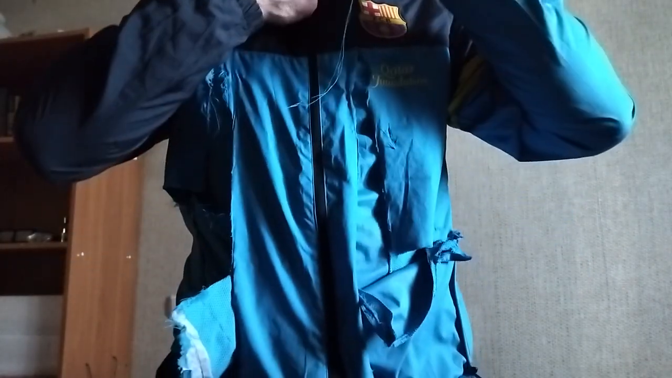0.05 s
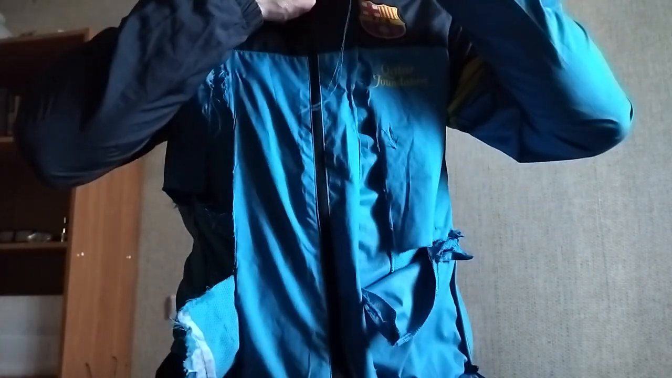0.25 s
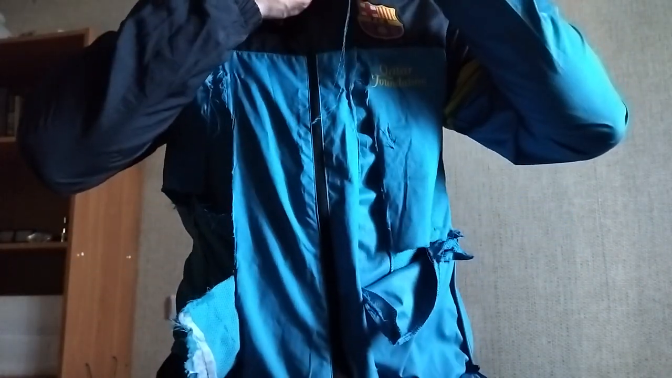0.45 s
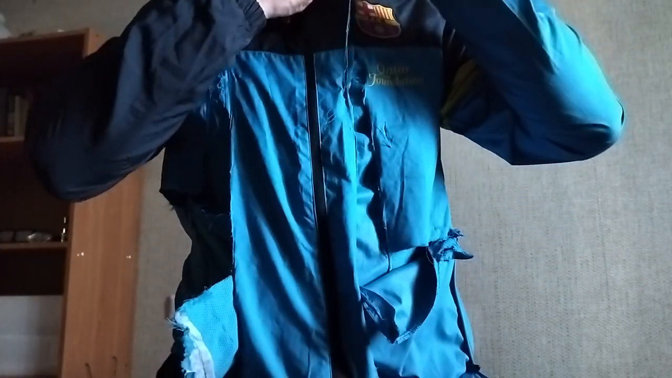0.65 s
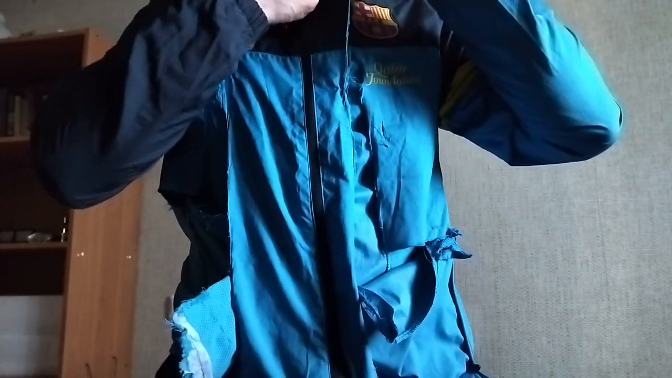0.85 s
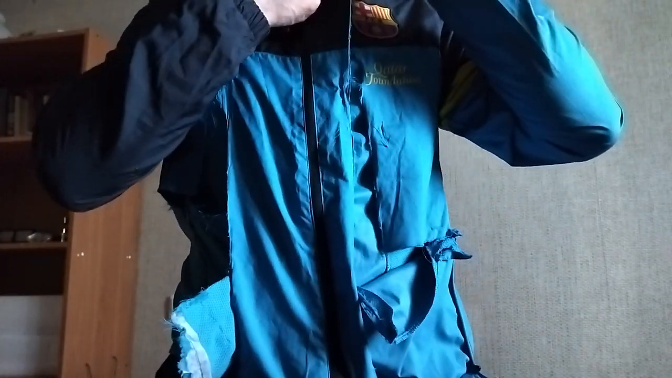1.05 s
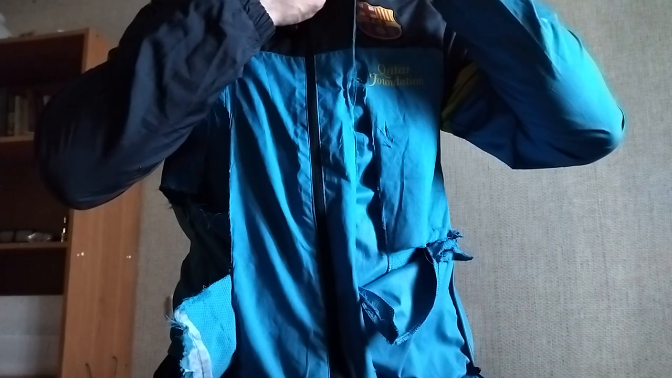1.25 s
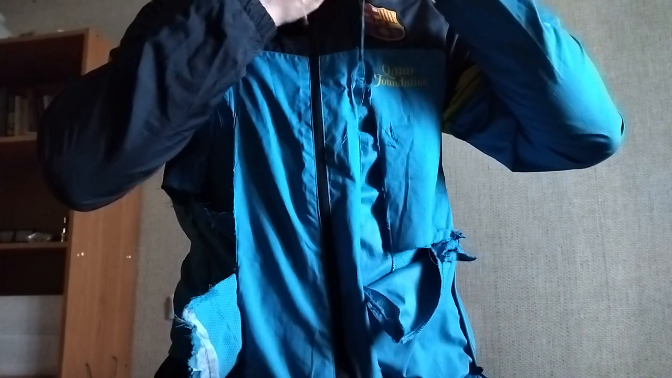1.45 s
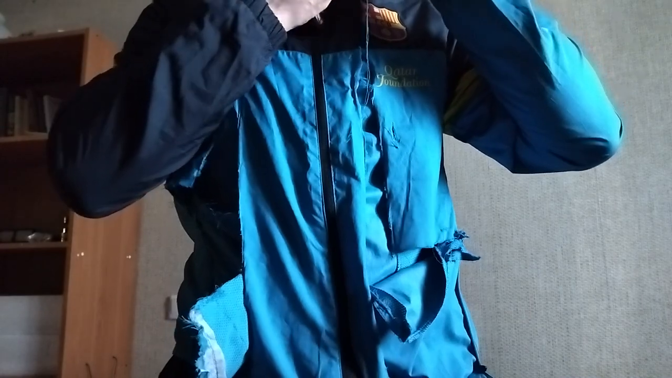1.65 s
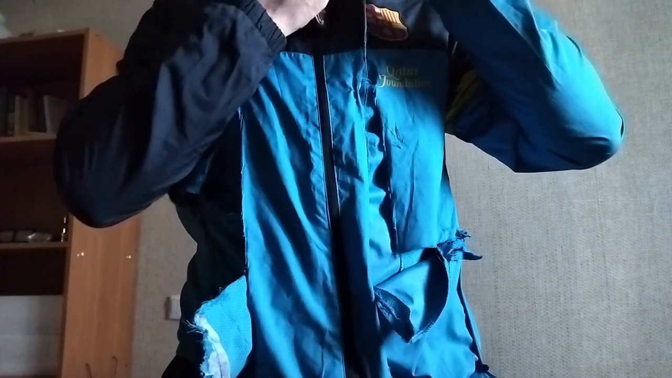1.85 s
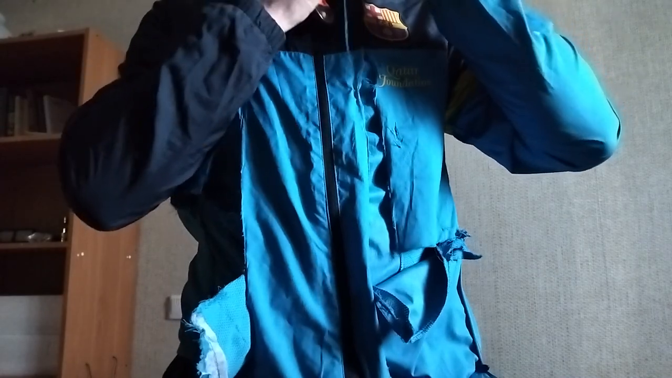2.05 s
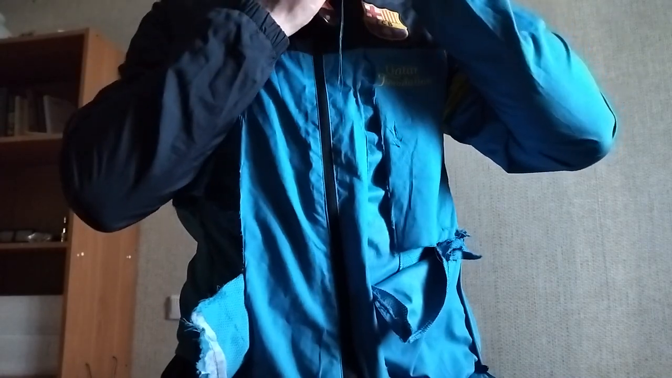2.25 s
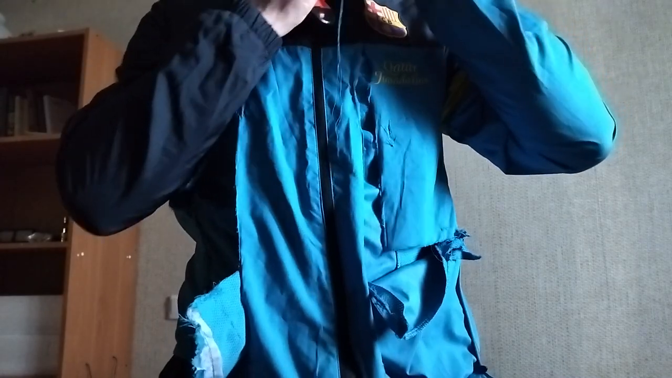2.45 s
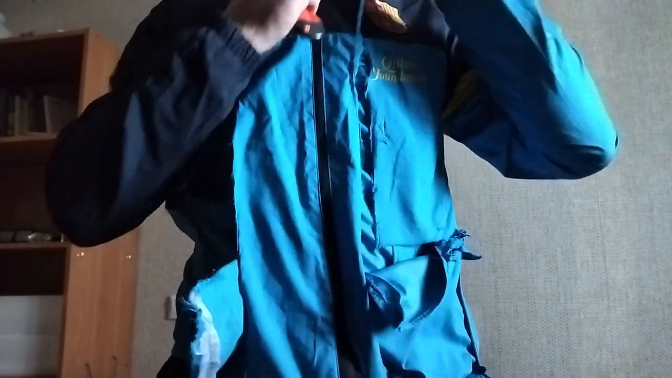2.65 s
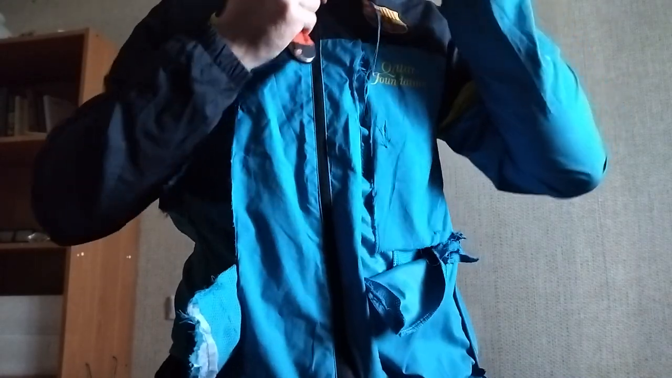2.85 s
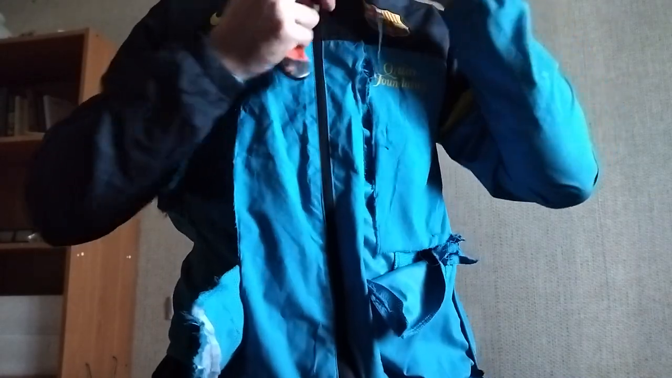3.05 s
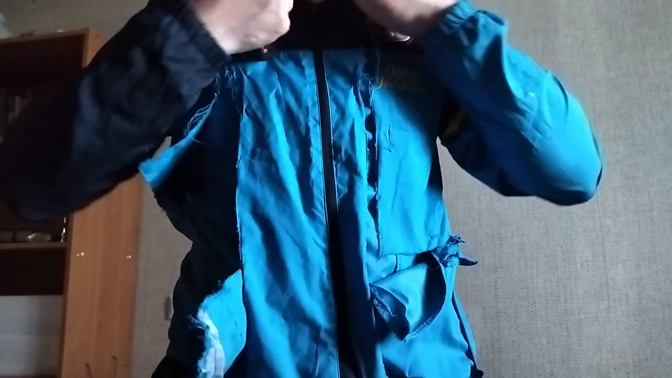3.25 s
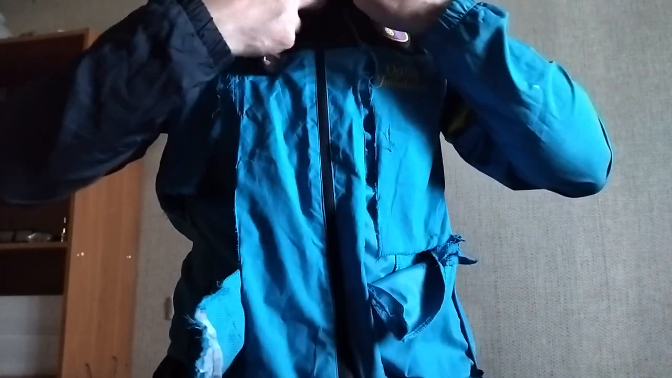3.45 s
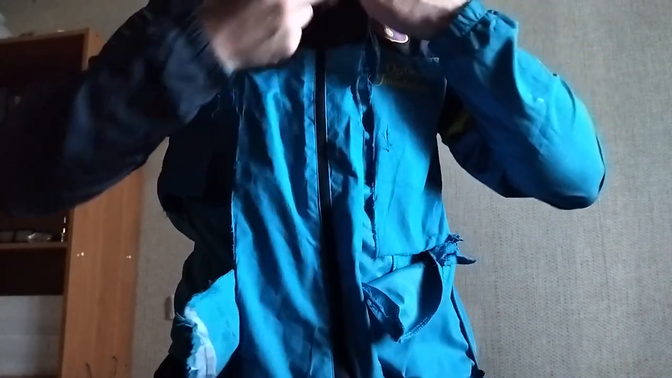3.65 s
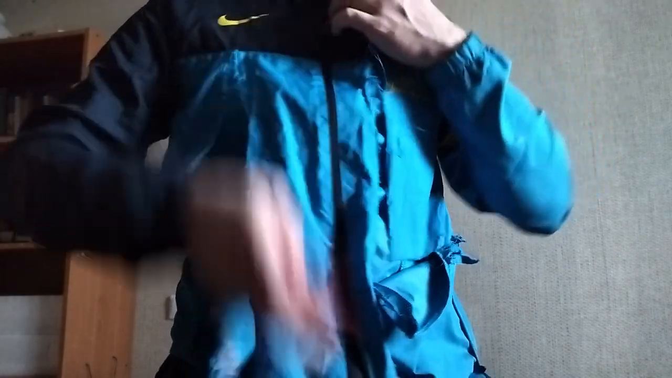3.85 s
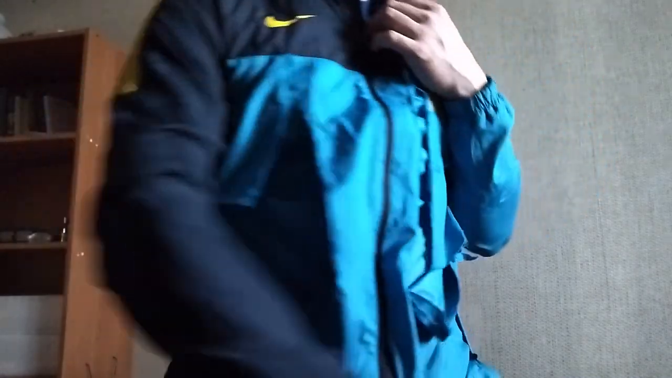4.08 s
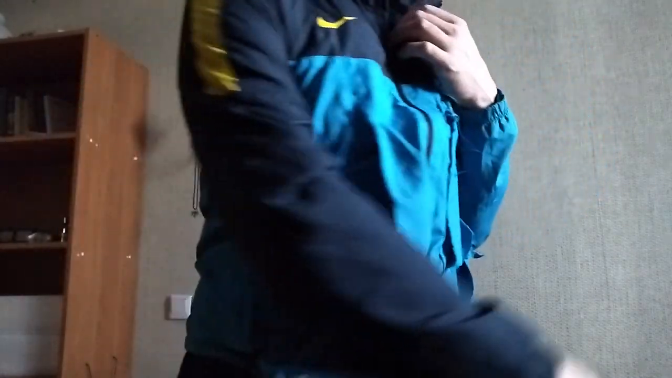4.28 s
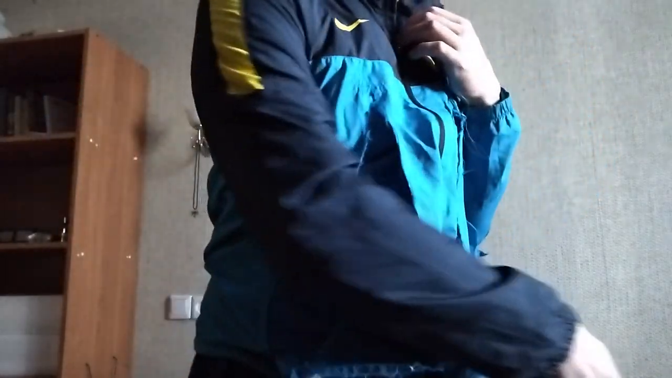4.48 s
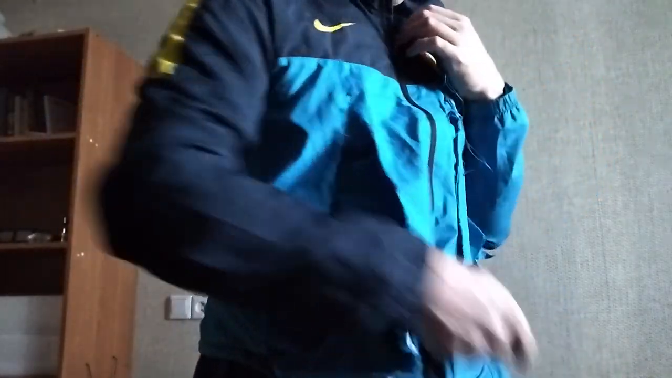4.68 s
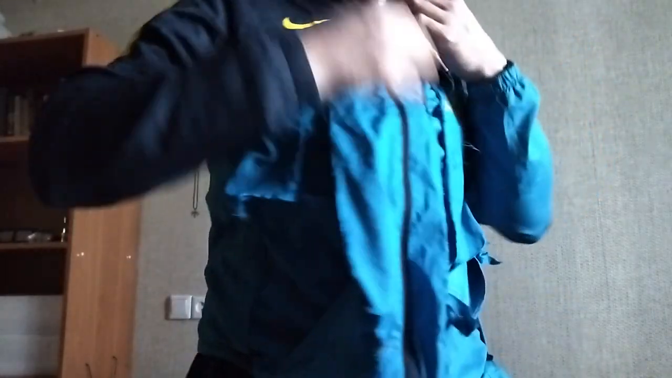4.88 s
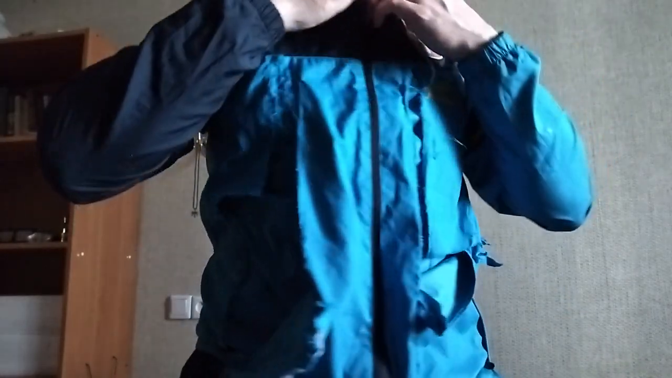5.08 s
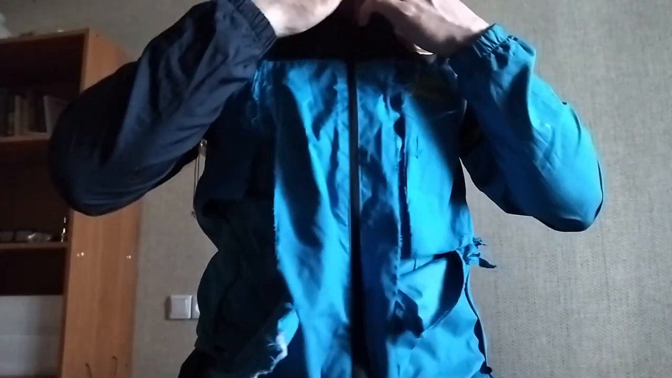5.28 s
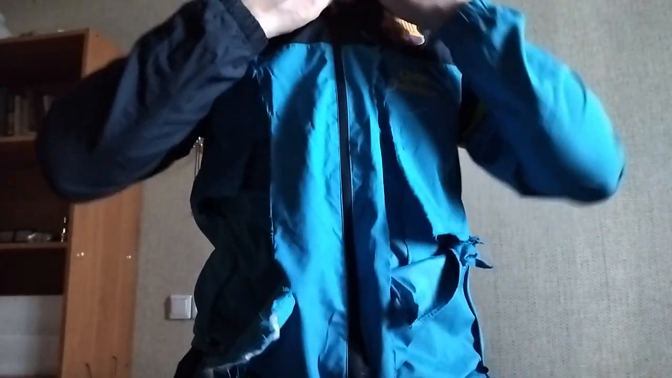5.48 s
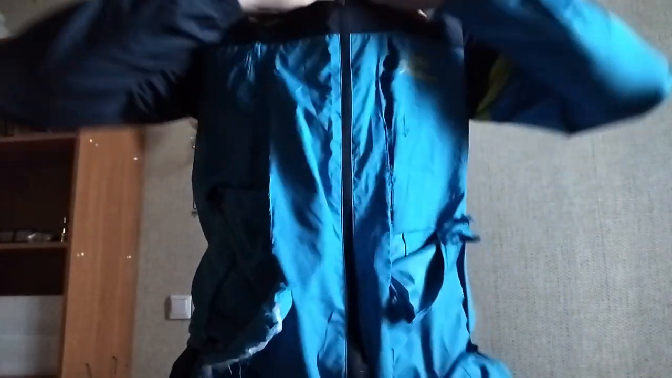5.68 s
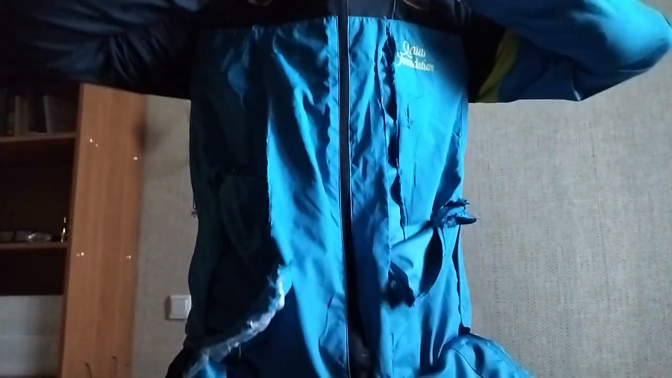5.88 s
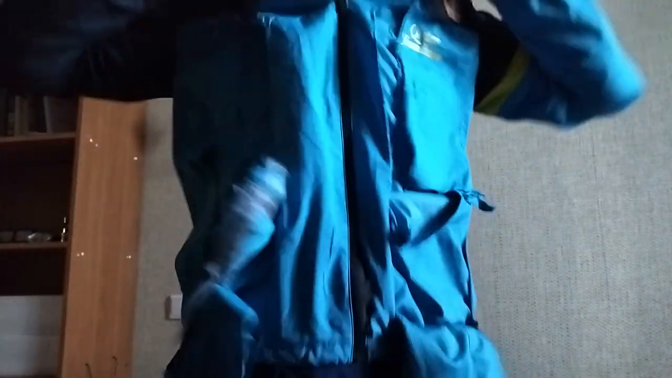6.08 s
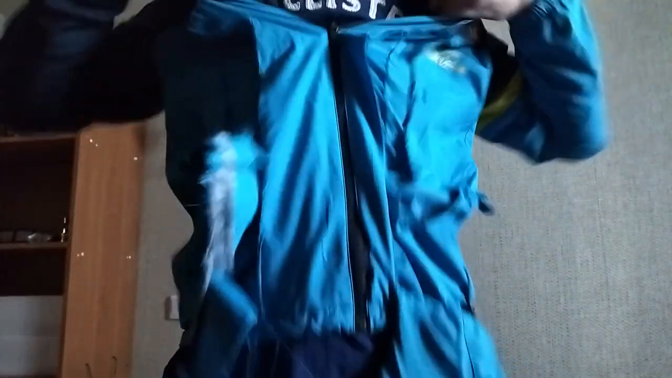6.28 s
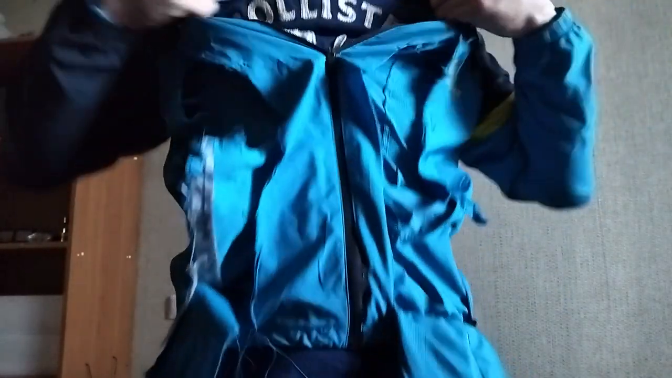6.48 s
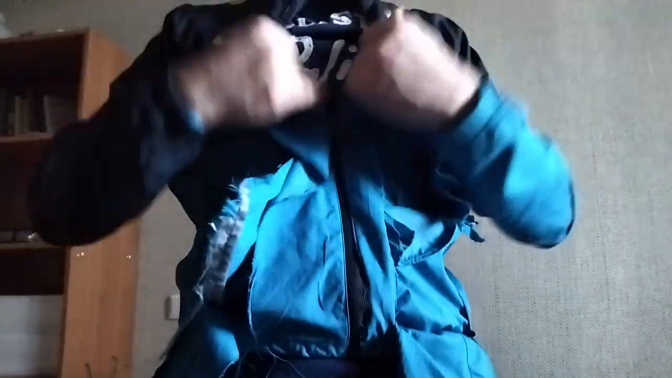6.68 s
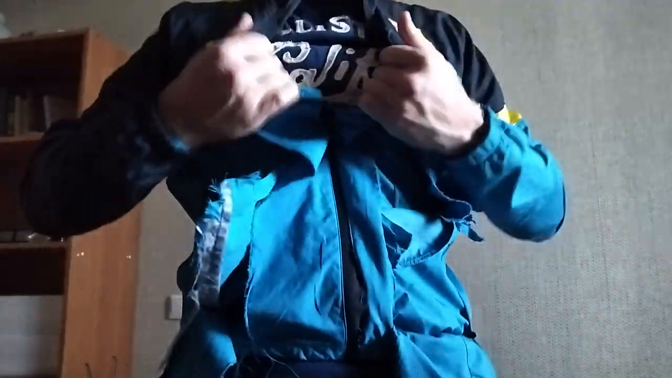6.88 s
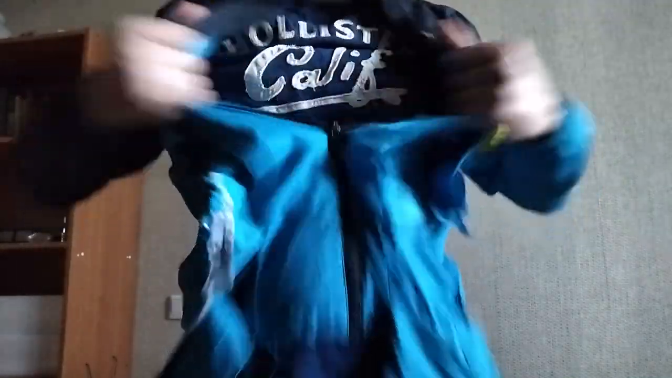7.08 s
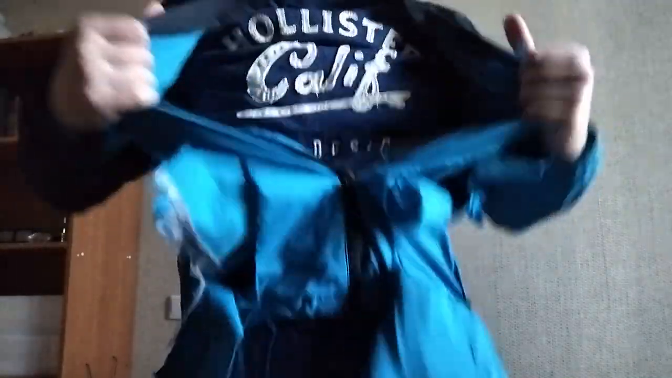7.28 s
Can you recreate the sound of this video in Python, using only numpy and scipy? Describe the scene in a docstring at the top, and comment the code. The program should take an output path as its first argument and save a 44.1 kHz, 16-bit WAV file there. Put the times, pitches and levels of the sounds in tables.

```python
"""A quiet hush and the soft rustle of a thin nylon jacket, worked at the seam by hands in a small quiet room.
It ticks, creaks and scrapes, a small tool lands on a table, then the cloth is ripped three times.
Single threads snap before and during the rips. Cloth is friction noise and random grains, ticks and snaps
are ringing flicks under puffs of noise, the creak is stick and slip, and threads in step are tones.
Two microphone ports a few centimetres apart hear it."""
import sys
import numpy as np
from scipy import signal
from scipy.fft import rfft, irfft, next_fast_len
from scipy.io import wavfile

SR = 44100
rng = np.random.default_rng(int(sys.argv[2]) if len(sys.argv) > 2 else 0)


def persist_wave(psi):
    """Save psi, clipped to +-1, as 16-bit WAV."""
    counts = np.round(np.clip(psi, -1, 1) * 32767).astype(np.int16)
    wavfile.write(sys.argv[1], SR, np.atleast_2d(counts).T)


def magnitude_from_level(level_db):
    """Linear magnitude for a level in decibels (20 dB per decade)."""
    exponent = np.asarray(level_db, float) / 20
    return 10 ** exponent


N = 323253
SIZE = next_fast_len(N + SR // 10, real=True)      # transform length, with room for filter tails
HZ = np.maximum(np.arange(SIZE // 2 + 1) * SR / SIZE, 1)


def rms_one(x):
    """Scale so that the mean of the channels has rms 1."""
    return x / np.sqrt(np.mean(np.atleast_2d(x).mean(axis=0) ** 2) + 1e-20)


def in_time(tables, rest_db=-120):
    """Columns of curve tables at every sample, at rest outside them."""
    s, *columns = np.transpose(np.vstack(tables))
    now = np.arange(N) / SR
    inside = np.any([(now >= t[0][0]) & (now <= t[-1][0]) for t in tables], axis=0)
    return [np.where(inside, np.interp(now, s, c), rest_db) for c in columns]


def at_hz(points):
    """A (frequency, value) table on the transform grid, joined along log frequency."""
    hz, value = np.transpose(points)
    return np.interp(np.log(HZ), np.log(np.maximum(hz, 1)), value)


# phase by which the left port leads the right: (frequency [Hz], lead [radians])
LEAD = [(0, 0), (1200, .1), (3300, 2.8), (10500, 3.2), (12500, 5.5), (16000, 6.3)]
# likeness of the two ports, before the power "apart": (frequency [Hz], likeness [0-1])
LIKENESS = [(60, 0.7), (130, 0.94), (640, 0.89), (1400, 0.68), (3000, 0.49), (7000, 0.11), (9000, 0.12),
            (15000, 0.24)]
# balance of the two ports: (frequency [Hz], left minus right [dB])
TILT = [(60, 0), (200, -1.5), (1300, -2), (2400, -1.5), (4400, 1), (8000, 2), (15000, 1)]
TOP_HZ = 15900


def ports(pair, colour, apart=1):
    """A shared and an unshared signal, coloured and dealt to the two ports; a larger apart makes them less alike."""
    steep_top = np.sqrt(1 + (HZ / TOP_HZ) ** 120)
    shared, own = rfft(pair, SIZE) * magnitude_from_level(at_hz(colour)) / steep_top
    likeness = np.clip(at_hz(LIKENESS), 0, 1) ** apart
    # each port takes half of the lead and of the tilt
    turn = np.exp(.5j * np.interp(HZ, *np.transpose(LEAD))) * magnitude_from_level(at_hz(TILT) / 2)
    left = (np.sqrt(1 + likeness) * shared + np.sqrt(1 - likeness) * own) * turn
    right = (np.sqrt(1 + likeness) * shared - np.sqrt(1 - likeness) * own) / turn
    return irfft([left, right], SIZE)[:, :N]


def passed(x, low_hz, high_hz, order=2):
    """What passes of a sound between two edges."""
    return signal.sosfilt(signal.butter(order, [low_hz, high_hz], "band", fs=SR, output="sos"), x)


def band(x, low_hz, high_hz, order=2):
    """One band of a sound, rms 1."""
    return rms_one(passed(x, low_hz, high_hz, order))


def noise():
    """Two rows of independent white noise."""
    return rng.standard_normal((2, N))


def grains(per_s, spread_db):
    """Random clicks of uneven size; both rows click at the same moments with their own signs and sizes."""
    sizes = magnitude_from_level(spread_db * np.minimum(rng.exponential(1, N), 4))
    clicks = rng.random(N) < per_s / SR
    return sizes * clicks * noise() / np.sqrt(np.maximum(per_s, 1))


def flicker(per_s, depth_db):
    """A gain that wanders at random."""
    r = np.exp(-2 * np.pi * per_s / SR)
    slow = signal.lfilter([1], [1, -2 * r, r * r], rng.standard_normal(N + SR // 2))[SR // 2:]
    return magnitude_from_level(depth_db * slow / slow.std())


# room tone and microphone hiss: (frequency [Hz], colour [dB])
HUSH_COLOUR = [(20, -43), (40, -12), (70, -4.5), (120, 2.5), (250, -1.5), (350, 2.5), (450, -6), (1300, -8),
               (2200, -10), (3500, -14.5), (5000, -17.5), (7000, -19), (9000, -60), (11000, -23),
               (15500, -19)]
HUSH_DB = -67


def hush():
    """Room tone and microphone hiss: steady coloured noise, nearly unlike at the two ports."""
    return magnitude_from_level(HUSH_DB) * rms_one(ports(noise(), HUSH_COLOUR, apart=9.0))


# steady rubbing of sleeves and front as the arms move: (time [s], level [dB], brightness [dB])
MOTION = [(0, -67.5, -1), (.4, -77, -0.5), (.9, -64.5, 1.5), (1.35, -74, -5), (2.3, -78, 0.5),
          (2.6, -66.5, -3), (2.97, -72, -2.5), (3.45, -68, -2), (3.86, -72, -1.5), (4.15, -62.5, -1.5),
          (4.67, -68, -1.5), (4.8, -64, -3.5), (5.35, -69, 0), (5.5, -64, -1.5), (5.75, -67.5, -0.5),
          (5.97, -62.5, -2), (6.13, -67.5, -4.5), (6.62, -54.5, -4), (6.84, -53, -2), (6.99, -63, -3),
          (7.33, -71, 9)]
# single quick swishes of the cloth: (peak time [s], half length to 1/e [s], level [dB], brightness [dB])
SWISHES = [(.06, 0.018, -73, -7), (0.195, 0.12, -68.5, -1.5), (0.481, 0.014, -70.5, 6),
           (0.689, 0.029, -64, 2.5), (0.787, 0.038, -59, 1.5), (1.05, 0.086, -61, 0.5),
           (1.146, 0.024, -59, -1.5), (1.272, 0.032, -63, -1.5), (1.394, 0.037, -62.5, 0.5),
           (1.55, 0.04, -68.5, 6.5), (1.666, 0.1, -61, -1), (2.08, 0.15, -71, -1),
           (2.814, 0.11, -64.5, -1.5), (3.106, 0.067, -73, -5), (3.306, 0.051, -73, -5),
           (3.552, 0.06, -62, 0.5), (3.709, 0.035, -60.5, -2), (4.474, 0.11, -62.5, -3.5),
           (5.6, 0.12, -60, -2.5), (5.868, 0.1, -62, -2.5), (7.07, 0.056, -58.5, -2.5)]


def rubbing():
    """Gains of body, middle and hiss: brightness trades body for hiss; swishes add as bell-shaped swells."""
    level_db, bright_db = in_time([MOTION])
    lean = np.array([[-1], [0], [1]])      # body, middle, hiss
    power = magnitude_from_level(level_db + lean * bright_db) ** 2
    for s, half_s, db, lean_db in SWISHES:
        swell = np.exp(-2 * ((np.arange(N) / SR - s) / half_s) ** 2)
        power += magnitude_from_level(db + lean * lean_db) ** 2 * swell
    return np.sqrt(power)


# colour of cloth sliding on cloth: (frequency [Hz], colour [dB per Hz])
RUSTLE_COLOUR = [(120, -3.5), (250, -2.5), (450, -3), (700, -2), (1300, 1), (2200, 7.5), (3500, 2.5),
                 (5000, -0.5), (7000, -4.5), (9000, 3.5), (11000, -8), (13000, -8), (15500, -11.5)]
SWISH_BAND_DB = -0.5   # middle band against the mean of body and hiss


def rustle():
    """Coated weave slides on itself: fine grains over smooth friction noise."""
    body, swish, hiss = rubbing()
    crinkle = grains(1500, spread_db=1.5) * flicker(33, depth_db=3.0)
    friction = noise() + magnitude_from_level(-10.5) * rms_one(crinkle)
    rub = ports(friction, RUSTLE_COLOUR, apart=1.45) * flicker(33, depth_db=0.5)
    out = body * band(rub, 202, 2180) * flicker(43, depth_db=1.27)
    out += magnitude_from_level(SWISH_BAND_DB) * swish * band(rub, 1767, 6250)
    return out + hiss * band(rub, 10660, 18000)


# low flapping at a motion of -65 dB, before its flicker; dB per dB of motion
FLAP_DB, FLAP_FOLLOWS = -77.5, 0.58


def flap():
    """Loose panels of cloth push air in the bass, the more the livelier the motion."""
    level_db, _ = in_time([MOTION])
    air = band(ports(noise(), HUSH_COLOUR), 120, 215)
    return magnitude_from_level(FLAP_DB + FLAP_FOLLOWS * (level_db + 65)) * air * flicker(15, depth_db=3.0)


def thumps(rows, cycles):
    """Each jolt flicks taut cloth, which swings up within a cycle and dies in a few, with a shorter overtone."""
    out, t = np.zeros(N + 1000), np.arange(1000) / SR
    for s, peak_db, hz, *_ in rows:
        tone = np.sin(2 * np.pi * hz * t)
        overtone = magnitude_from_level(-9.0 - 30 * hz * t / cycles) * np.sin(2 * np.pi * 2.24 * hz * t)
        rise, decay = 1 - np.exp(-6.0 * hz * t), magnitude_from_level(-60 * t * hz / cycles)
        swing = (tone + overtone) * rise * decay
        start = round((s + 0.13 / hz) * SR)
        out[start:start + 1000] += magnitude_from_level(peak_db) * swing / np.abs(swing).max()
    radiated = passed(out[:N], 2420, 17600, order=1)      # small patches radiate their bass poorly
    return ports([magnitude_from_level(9.5) * radiated, np.zeros(N)], [(60, -12.0), (250, 0), (4000, 1.5)])


def bursts(rows, t60_s, axis, rise_hz=900):
    """Envelope of short puffs of noise, one for each jolt: a quick rise, then dying away."""
    clicks = np.zeros(N)
    clicks[[round(row[0] * SR) for row in rows]] = magnitude_from_level(np.array(rows)[:, axis])
    r = np.exp(-2 * np.pi * rise_hz / SR)
    fall = magnitude_from_level(-60 / (t60_s * SR))
    return signal.lfilter([1 - r], np.convolve([1, -fall], [1, -r]), clicks + 1e-18)


# crack and fizz of a jolt: (low edge [Hz], high edge [Hz])
PUFF_BANDS = [(1700, 5140), (5000, 16700)]


def puffs(rows, t60_s, colour):
    """Each jolt stirs a crack and a fizz: two bands of noise that die away quickly."""
    out, air = 0, ports(noise(), colour)
    for column, (low_hz, high_hz) in enumerate(PUFF_BANDS, start=3):
        puff = band(air, low_hz, high_hz) * bursts(rows, t60_s, axis=column)
        out = out + passed(puff, low_hz, high_hz) * magnitude_from_level(-1.0)
    return out


# ticks of stiff cloth and of the tool, as strengths that drive the flick and the puffs:
# (time [s], panel drive [dB], panel pitch [Hz], crack drive [dB], fizz drive [dB])
TICKS = [(0.596, -50.5, 695, -63, -60), (0.805, -54, 1670, -55, -65), (0.836, -55, 1500, -66, -66),
         (0.9, -62, 1400, -55, -48), (0.914, -44.5, 1600, -50, -46), (0.961, -53, 1300, -55, -64),
         (0.9855, -55, 1060, -49, -46.5), (1.025, -49.5, 960, -52.5, -54), (1.054, -66, 930, -49, -43.5),
         (1.132, -56, 1200, -60, -64), (1.1485, -44.5, 1900, -63, -62), (1.151, -46, 1520, -60, -62),
         (1.162, -54, 1900, -53, -62), (1.2225, -56, 1150, -57, -59), (1.6415, -36.5, 980, -55, -47),
         (1.911, -69, 1680, -55, -54.5), (2.082, -53, 1330, -57, -56), (3.296, -49, 1760, -47, -40),
         (3.3222, -38, 990, -56, -71), (3.338, -57, 1500, -54, -47.5), (3.537, -64, 1530, -49.5, -62),
         (3.541, -48, 1290, -56, -65), (3.678, -57, 1750, -63, -36), (3.699, -53, 940, -50.5, -56),
         (3.9675, -60, 1700, -46.5, -50), (3.983, -51, 1380, -49, -39), (4.138, -60, 1700, -50, -62),
         (4.1685, -58, 1630, -42, -52), (4.2548, -53, 1900, -34, -34), (4.827, -61, 1790, -33, -50),
         (4.8395, -40.5, 420, -33, -45), (4.851, -60, 2000, -39, -52), (4.868, -60, 2000, -53, -55),
         (5.489, -48, 970, -71, -54), (5.823, -43, 600, -72, -69), (7.105, -47, 770, -67, -51)]


def ticks():
    """Stiff cloth and the tool tick: a low flick under a crack and a fizz."""
    return thumps(TICKS, cycles=5.4) + puffs(TICKS, .022, SCRAPE_COLOUR)


# single slips of the strained seam, strong and weak, in two creaks:
# (time [s], flick drive [dB], panel pitch [Hz])
SLIPS = [(2.482, -46, 1170), (2.5002, -41, 1030), (2.5115, -39, 1350), (2.521, -39, 1080),
         (2.5305, -42, 1270), (2.544, -49, 1300), (2.5595, -46, 1520), (2.574, -47, 990),
         (2.5875, -58, 1000), (2.6062, -40.5, 794), (2.62, -49, 700), (2.638, -55, 700), (2.652, -48, 895),
         (2.663, -46, 1440), (2.675, -41.5, 760), (2.686, -47, 700), (2.698, -62, 700), (2.731, -60, 900),
         (2.7425, -44, 686), (2.7545, -52, 1200), (2.7625, -46, 800), (3.052, -48, 600), (3.064, -51, 1150),
         (3.074, -47, 1050), (3.095, -48, 1090), (3.108, -51, 1190), (3.125, -50, 1100), (3.136, -53, 2500),
         (3.142, -51, 900)]
# random slips in a creak of the strained seam, as middle values that chance spreads:
# (time [s], slips [per s], flick drive [dB], panel pitch [Hz], dull knock level [dB])
CREAK = [
    [(2.548, 69.5, -68, 800, -71), (2.66, 85, -64, 900, -76), (2.75, 90, -59, 700, -73),
     (2.77, 135, -46, 750, -71), (2.8, 142, -45, 740, -68), (2.83, 184, -50, 745, -64.5),
     (2.88, 203, -52, 690, -78.5), (2.905, 200, -59, 700, -80)],
]
# colour of the dull knocks: (frequency [Hz], colour [dB per Hz])
CREAK_COLOUR = [(100, -5), (165, 9.5), (250, 6), (450, 11), (700, -1.5), (1300, 8), (2200, 2), (3500, -26)]
SLIP_PITCH_SPREAD, SLIP_SPREAD_DB = 0.13, 3   # pitch spread is in natural log


def creak():
    """Stick and slip at an uneven rate: listed slips are flicks of the cloth alone, random slips add a dull knock."""
    per_s, flick_db, hz, level_db = in_time(CREAK)
    turns = np.cumsum(np.maximum(per_s, 0) * flicker(60, depth_db=1.5)) / SR
    # a random slip falls at each whole turn
    slips = np.diff(np.floor(turns), prepend=0) * magnitude_from_level(rng.normal(0, 1.7, N))
    knock = ports([slips, slips * rng.standard_normal(N)], CREAK_COLOUR)
    chance, now = noise(), np.flatnonzero(slips)
    flick_db = flick_db + SLIP_SPREAD_DB * chance[0]
    hz = hz * np.exp(SLIP_PITCH_SPREAD * chance[1])
    flicks = np.transpose([np.arange(N) / SR, flick_db, hz])[now]
    return magnitude_from_level(level_db) * band(knock, 88, 1500) + thumps(np.vstack([SLIPS, flicks]), cycles=5.1)


# short scrapes of something hard over a surface:
# (time [s], held [s], dying t60 [s], swish level [dB], hiss level [dB], topmost hiss level [dB])
SCRAPES = [(3.299, 0.07, 0.12, -61, -73, -83), (3.917, 0.026, .08, -60.5, -61.5, -71),
           (3.985, 0.03, 0.13, -48, -46.5, -54), (4.03, 0.0088, 0.075, -49, -45.5, -49),
           (4.07, 0.12, 0.12, -59.5, -69, -72), (4.258, 0.0051, 0.097, -45, -59, -47),
           (4.819, 0.036, 0.15, -45.5, -49.5, -47), (4.922, 0.036, .15, -59, -61.5, -70),
           (6.023, 0.008, 0.12, -45.5, -66, -62)]
# colour of the grit: (frequency [Hz], colour [dB per Hz])
SCRAPE_COLOUR = [(1600, -9), (2100, 5), (4300, 7), (5200, -1), (7000, 6.5), (9000, 5), (12000, 0.5),
                 (15500, -9.5)]
SCRAPE_RISE_S = 0.0043


def scrapes():
    """Gritty bright friction with nothing in the bass; each scrape rises, holds and dies away."""
    gains, now = 0, np.arange(N) / SR
    for s, held_s, t60_s, *bands_db in SCRAPES:
        rise = np.clip((now - s) / SCRAPE_RISE_S, 0, 1)
        decay = magnitude_from_level(-60 * np.maximum(now - s - held_s, 0) / t60_s)
        gains = gains + np.outer(magnitude_from_level(np.array(bands_db)), rise * decay)
    grit = ports(grains(7000, spread_db=2.0) * flicker(57, depth_db=2.5), SCRAPE_COLOUR)
    swish = band(grit, 1430, 5200, order=3)
    hiss = band(grit, 5400, 13000)
    topmost = band(band(grit, 12300, 18000), 12300, 18000)      # twice for steeper edges
    return gains[0] * swish + gains[1] * hiss + gains[2] * topmost


THUD_S, THUD_DB, THUD_HZ, THUD_T60_S = 4.835, -61, 70, 0.16   # the tool lands on a table


def thud():
    """A soft low knock through the table, a dying sine, alike at both ports."""
    t = np.maximum(np.arange(N) / SR - THUD_S, 0)
    knock = magnitude_from_level(THUD_DB - 60 * t / THUD_T60_S) * np.sin(2 * np.pi * THUD_HZ * t)
    return np.array([knock, knock])


# the pitch that the cloth's patches favour as its tightness changes through each rip: (start [Hz], end [Hz])
TAUT = [(640, 700), (830, 1000), (1250, 1000)]


def tautness():
    """Favoured pitch of the cloth at every sample."""
    ends_s = [rip[k][0] for rip in RIPS for k in (0, -1)]
    return np.interp(np.arange(N) / SR, ends_s, np.ravel(TAUT))


# lesser threads at random, their panel drive above the panel level
STRAY_SNAPS_PER_S, STRAY_OVER_DB, STRAY_SPREAD_DB = 50, 4, 2.5
# their crack against the panel level, their fizz against the fizz level
STRAY_CRACK_DB, STRAY_FIZZ_DB = -9, 5.5


def stray_snaps():
    """Rows of lesser snaps that fall at random, as strong as the tear runs just then."""
    now = np.flatnonzero(rng.random(N) < STRAY_SNAPS_PER_S / SR)
    panel_db, fizz_db = [curve[now] for curve in in_time(RIPS)]
    chance = rng.standard_normal((len(now), 2))
    jolt_db = STRAY_SPREAD_DB * chance[:, 0]
    hz = tautness()[now] * np.exp(0.32 * chance[:, 1])
    rows = np.transpose([now / SR, panel_db + STRAY_OVER_DB + jolt_db, hz,
                         panel_db + STRAY_CRACK_DB + jolt_db, fizz_db + STRAY_FIZZ_DB + jolt_db])
    return rows[panel_db > -100]      # only while a rip runs


# seam threads snapping at set moments, strong and faint, as strengths that drive the flick and the puffs:
# (time [s], panel drive [dB], panel pitch [Hz], crack drive [dB], fizz drive [dB])
SEAM_SNAPS = [(6.0194, -27.5, 528, -31.5, -28), (6.1325, -45.5, 700, -55, -65),
              (6.1564, -6, 695, -21.5, -20), (6.1793, -6.5, 617, -21, -15), (6.2735, -24, 1100, -19, -21),
              (6.2965, -27, 1200, -26, -21), (6.2995, -15, 900, -47, -25), (6.4045, -20, 925, -41, -16.5),
              (6.4105, -14, 830, -47, -41), (6.419, -13.5, 960, -40, -32), (6.438, -20, 720, -21.5, -18),
              (6.4424, -15.5, 785, -28, -20), (6.4532, -29, 760, -43, -35), (6.4682, -18, 1290, -21, -34),
              (6.4872, -27, 750, -34, -33), (6.5025, -15.5, 1500, -43, -25), (6.5387, -16.5, 795, -38, -44),
              (7.1732, -19.5, 1460, -19, -19.5), (7.1824, -15, 650, -14, -20),
              (7.1893, -12.5, 1245, -19, -25), (7.2052, -11, 1260, -17, -12),
              (7.2107, -23, 1040, -12.5, -32), (7.2162, -11, 830, -23, -24), (7.2268, -8, 1300, -22, -15.5),
              (7.2299, -15, 1220, -31, -23), (7.235, -16, 1360, -28, -16), (7.2392, -19, 1320, -33, -34),
              (7.247, -21, 1020, -34, -20)]


def snaps():
    """Single threads snap before and during the rips: a low flick of the cloth under a crack and a fizz."""
    rows = np.vstack([SEAM_SNAPS, stray_snaps()])
    return thumps(rows, cycles=3.96) + puffs(rows, .012, RIP_COLOUR)


# three rips, how hard the tear runs: (time [s], panel level [dB], fizz level [dB])
RIPS = [
    [(6.152, -45, -70), (6.16, -29, -45), (6.17, -32, -35), (6.188, -23, -27), (6.21, -40, -24.5),
     (6.228, -29, -22.5), (6.245, -27, -25.5), (6.262, -38, -33), (6.285, -61, -31), (6.325, -59, -80),
     (6.395, -67, -76)],
    [(6.4, -53, -59), (6.414, -35, -31), (6.432, -33, -28), (6.445, -32, -34), (6.46, -36, -28.5),
     (6.482, -31, -30), (6.505, -31, -28.5), (6.528, -33.5, -31.5), (6.545, -35, -35), (6.57, -55, -80),
     (6.62, -46, -74)],
    [(7.168, -57, -66), (7.178, -29.5, -52), (7.196, -62, -37), (7.222, -30, -42), (7.232, -21.5, -27.5),
     (7.265, -26, -23.5), (7.3, -26, -25), (7.33, -24, -24)],
]
# colour of tearing cloth: (frequency [Hz], colour [dB per Hz])
RIP_COLOUR = [(30, -39), (60, -45), (120, -11.5), (250, -11.5), (450, -0.5), (700, 0.5), (1300, 0.5),
              (2200, -3), (3500, -5.5), (5000, -14.5), (7000, -25), (9000, -16), (11000, -19.5),
              (12500, -11), (15500, -13.5)]
BREAKS_PER_S = 2300


def rips():
    """Threads break in a dense uneven stream; each flicks its own patch of taut cloth and the torn edge fizzes."""
    panel_db, fizz_db = in_time(RIPS)
    breaks = grains(BREAKS_PER_S, spread_db=2.5) * flicker(170, depth_db=3.0)      # breaks come in clumps
    taut_hz = tautness() * np.exp(0.16 * rng.standard_normal(N))
    taut_hz *= np.where(rng.random(N) < .3, 1.9, 1)      # some breaks flick a patch half as wide
    patches = np.geomspace(300, 3000, num=24)
    nearest = np.digitize(taut_hz, np.sqrt(patches[1:] * patches[:-1]))
    ringing = breaks.copy()
    for k, hz in enumerate(patches):
        r, w = magnitude_from_level(-60 * hz / (16.0 * SR)), 2 * np.pi * hz / SR      # a patch dies 60 dB in 16 cycles
        struck = breaks * (nearest == k) + 1e-18
        ring = signal.lfilter([0, np.sin(w)], [1, -2 * r * np.cos(w), r * r], struck)
        ringing += np.sqrt(w) * ring * magnitude_from_level(-11.0)
    panel = band(ports(ringing, RIP_COLOUR), 40, 6500)
    edge = band(ports(grains(18000, spread_db=2.0), RIP_COLOUR), 5500, 18000)
    return magnitude_from_level(panel_db) * panel + magnitude_from_level(fizz_db) * edge


# further layers of each rip: (time [s], crackle level [dB], low shudder level [dB])
COARSE = [
    [(6.153, -45, -30), (6.158, -42, -33), (6.167, -36, -51), (6.187, -31, -33), (6.221, -26, -48),
     (6.249, -33, -37), (6.279, -38, -47), (6.305, -46, -43.5), (6.33, -49, -47)],
    [(6.402, -41, -36.5), (6.436, -32, -41), (6.476, -30, -33.5), (6.502, -32, -48), (6.546, -47, -44),
     (6.58, -54, -45)],
    [(7.17, -47, -50), (7.184, -37, -46), (7.196, -39, -48), (7.206, -32, -47), (7.22, -24, -41),
     (7.24, -38, -30.5), (7.28, -31, -36), (7.33, -29, -29)],
]
CRACKLES_PER_S = 2200


def coarse():
    """The tear crackles densely in the middle treble, in uneven clumps, and the jerked jacket front shudders."""
    crackle_db, shudder_db = in_time(COARSE)
    crackle = grains(CRACKLES_PER_S, spread_db=2.0) * flicker(70, depth_db=2.0)
    crackle = ports(crackle, RIP_COLOUR, apart=0.49)
    shudder = ports(grains(400, spread_db=4.5), [(40, -30.0), (100, -18.0), (170, 1.5), (1000, 4)])
    return magnitude_from_level(crackle_db) * band(crackle, 1540, 4800) + magnitude_from_level(shudder_db) * band(shudder, 145, 550)


# the tear runs evenly across the weave and threads break in step, around these values before colour and waver:
# (time [s], threads [per s], level [dB], overtone against the tone [dB])
ZIP = [
    [(6.19, 630, -49, -8), (6.2, 630, -21, -19), (6.208, 610, -33, -14), (6.214, 640, -25, -3),
     (6.222, 680, -25.5, 1), (6.231, 734, -16.5, -1), (6.238, 860, -28, -6), (6.244, 690, -32, -11),
     (6.254, 580, -23.5, 5.5), (6.264, 580, -48, -7)],
    [(6.336, 690, -59, -14), (6.345, 630, -51, -14), (6.358, 630, -56, -16), (6.37, 690, -48, -14),
     (6.382, 730, -46, -8), (6.397, 640, -59, -18)],
]
# brief runs of a few threads in step, before colour: (middle time [s], length [s], threads [per s], peak [dB])
RUNS = [(6.316, 0.0064, 640, -32), (6.407, 0.0049, 910, -14.5), (6.421, 0.0096, 717, -20),
        (6.444, 0.0084, 746, -17), (6.458, 0.0063, 670, -22), (6.4675, 0.0093, 1320, -17.5),
        (6.491, 0.0069, 1160, -20), (6.509, 0.011, 953, -22), (7.231, 0.0068, 1310, -7),
        (7.2594, .009, 1060, -32), (7.264, 0.0088, 1140, -21), (7.283, 0.0075, 860, -19.5),
        (7.294, 0.0073, 1230, -16), (7.316, 0.0066, 860, -21)]
RUN_OVERTONE_DB, ZIP_WAVER_DB = -16, 0.5   # overtone against the tone; waver of the rate


def in_step():
    """Evenly spaced breaks buzz at their own rate, with an overtone: wavering glides and brief swelling runs."""
    per_s, level_db, over_db = in_time(ZIP)
    turn = 2 * np.pi * np.cumsum(np.maximum(per_s, 0) * flicker(177, depth_db=ZIP_WAVER_DB)) / SR
    buzz = np.sin(turn) + magnitude_from_level(over_db) * np.sin(2 * turn + 1)
    out = np.sqrt(2) * magnitude_from_level(level_db) * buzz * flicker(120, depth_db=1.5)
    t = np.arange(-500, 500) / SR
    for s, length_s, hz, db in RUNS:
        start = rng.uniform(0, 2 * np.pi, 2)
        swell = np.cos(np.pi * np.clip(t / length_s, -.5, .5))
        turn, at = 2 * np.pi * hz * t, round(s * SR)
        run = np.sin(turn + start[0]) + magnitude_from_level(RUN_OVERTONE_DB) * np.sin(2 * turn + start[1])
        out[at - 500:at + 500] += magnitude_from_level(db) * swell * run
    return ports([out, np.zeros(N)], [(60, 0.5), (4000, -5.0)])


ROOM_T60_S, ROOM_DB, WALL_HZ = 0.26, -10.5, 3530   # echo energy [dB]; the echoes lose treble around WALL_HZ


def room(x):
    """Diffuse echoes, unlike in the treble at the two ports, starting after the first wall and dying away."""
    t = np.arange(SR // 2) / SR
    onset = np.clip((t - .005) / 0.0072, 0, 1)
    echoes = rng.standard_normal((2, len(t))) * magnitude_from_level(-60 * t / ROOM_T60_S) * onset
    colour = [(100, -3), (700, 2), (WALL_HZ, -3), (6000, -9), (16000, -10)]
    echoes = ports(echoes, colour, apart=7.0)[:, :len(t)]
    echoes *= magnitude_from_level(ROOM_DB) / np.sqrt(np.sum(echoes ** 2) / 2)
    return signal.fftconvolve(x[:1], echoes, axes=1)[:, :N]      # the left port's sound feeds both


def scene():
    """The jacket in the room, over the hush."""
    jacket = rustle() + flap() + ticks() + creak() + scrapes() + thud()
    jacket = jacket + snaps() + rips() + coarse() + in_step()
    return jacket + room(jacket) + hush()


def roll_off(x):
    """The treble ends steeply here."""
    return signal.sosfilt(signal.butter(12, 16000, fs=SR, output="sos"), x)


def record(dry):
    """The loudest peaks are rounded, then the lowest bass and the top are cut."""
    rounded = 0.8 * np.tanh(dry / 0.9)
    mix = passed(rounded, 12, 16100, order=8)
    return roll_off(mix)


dry = scene()
out = record(dry)
persist_wave(out)
```